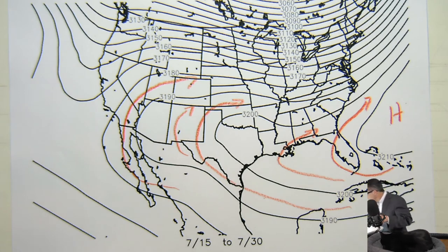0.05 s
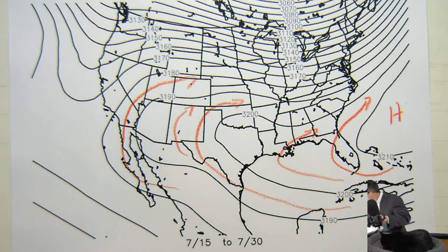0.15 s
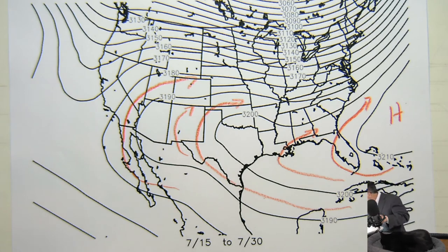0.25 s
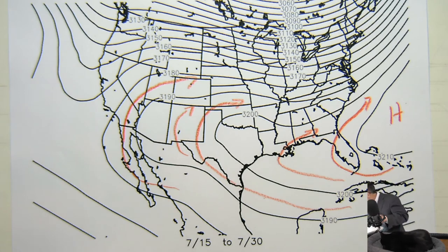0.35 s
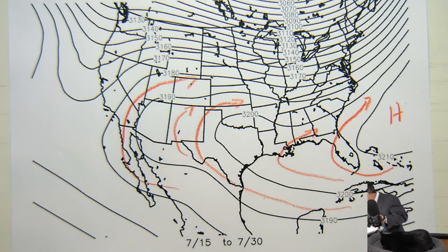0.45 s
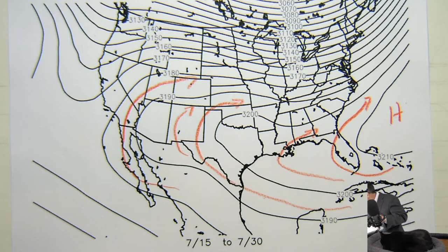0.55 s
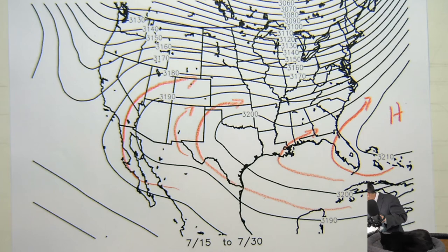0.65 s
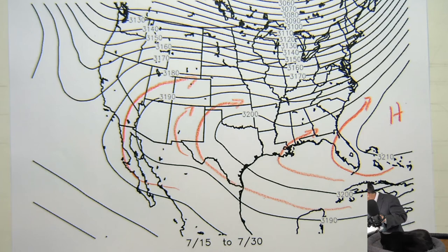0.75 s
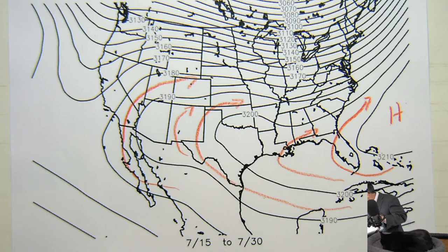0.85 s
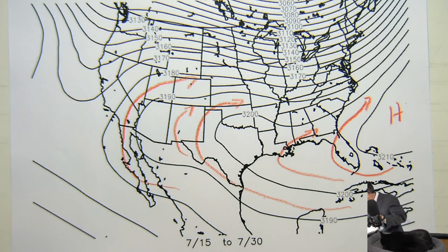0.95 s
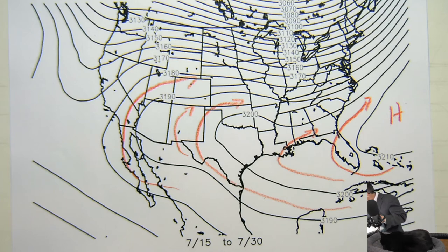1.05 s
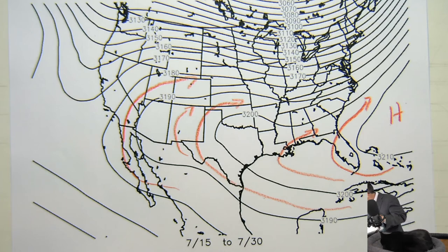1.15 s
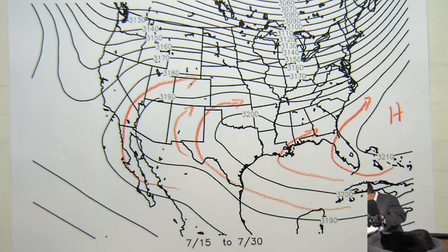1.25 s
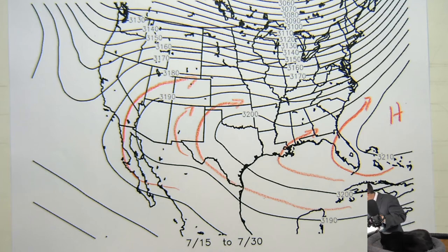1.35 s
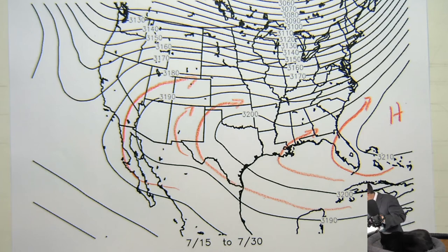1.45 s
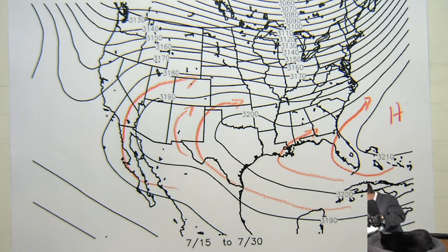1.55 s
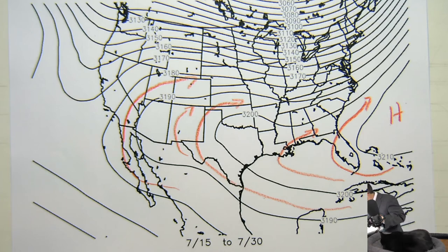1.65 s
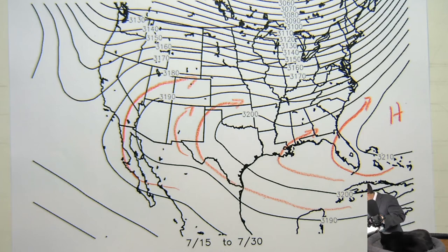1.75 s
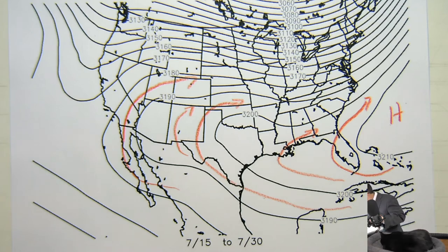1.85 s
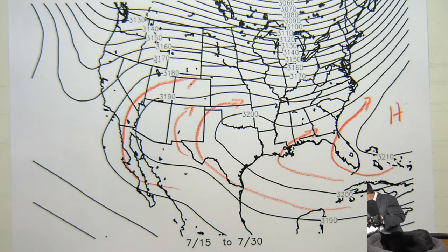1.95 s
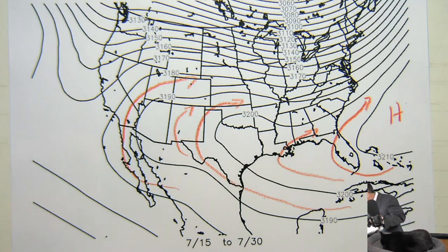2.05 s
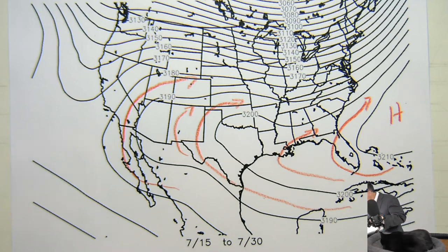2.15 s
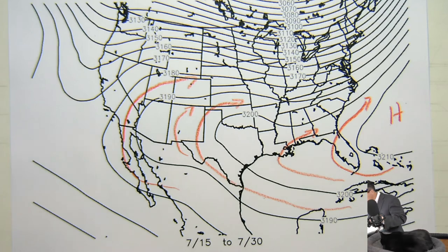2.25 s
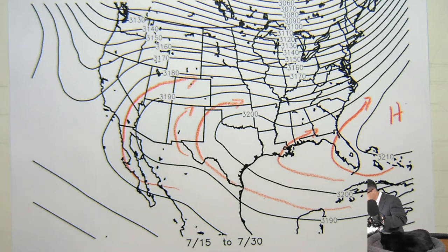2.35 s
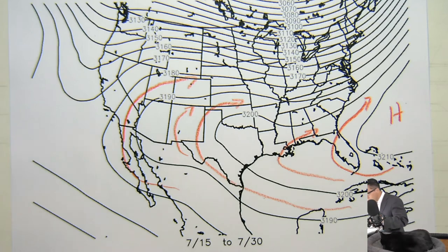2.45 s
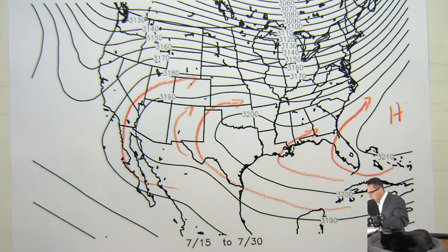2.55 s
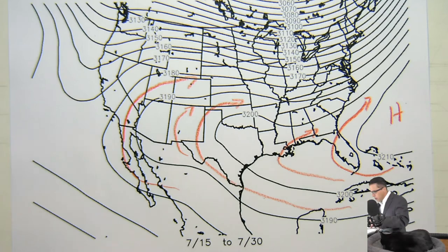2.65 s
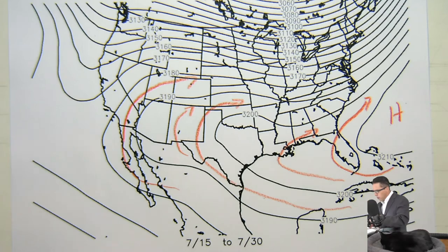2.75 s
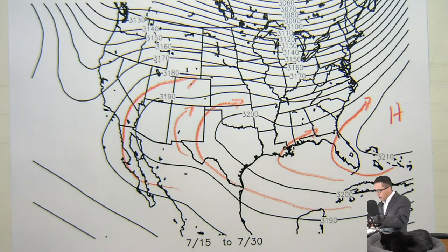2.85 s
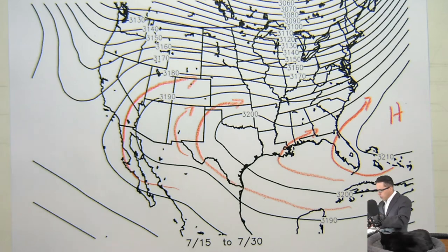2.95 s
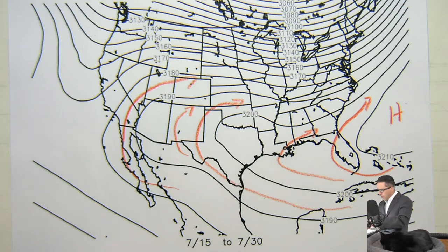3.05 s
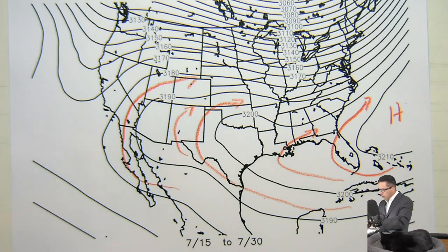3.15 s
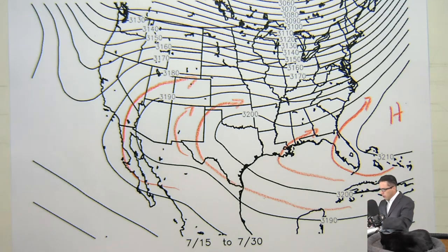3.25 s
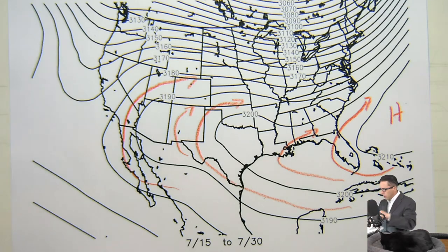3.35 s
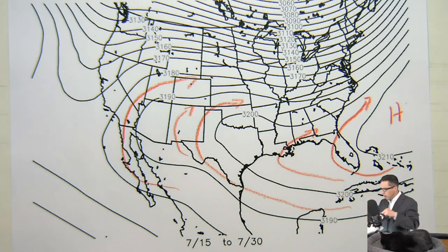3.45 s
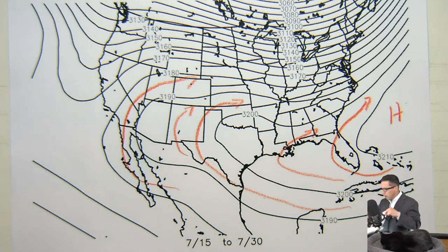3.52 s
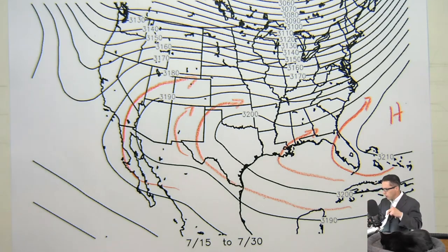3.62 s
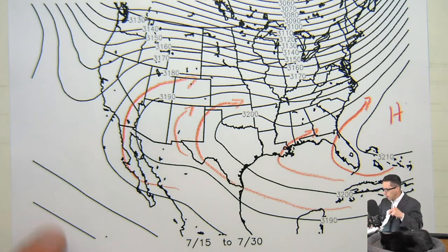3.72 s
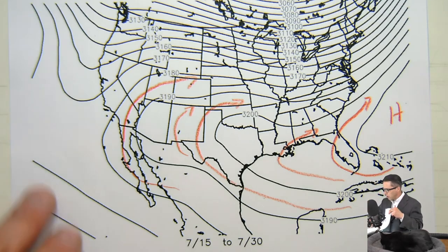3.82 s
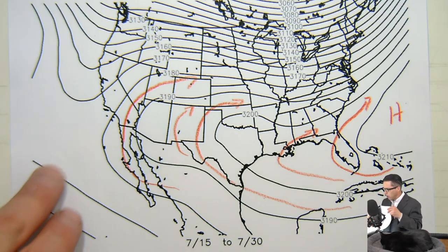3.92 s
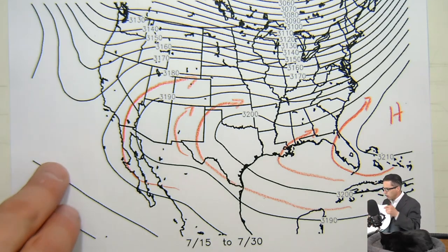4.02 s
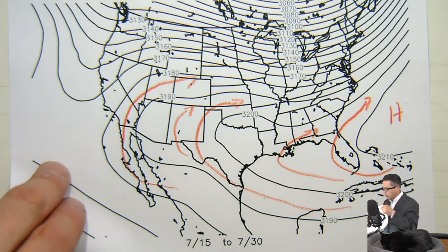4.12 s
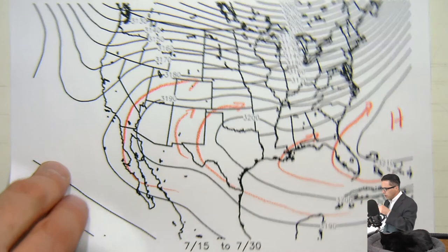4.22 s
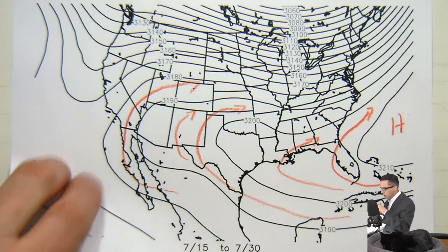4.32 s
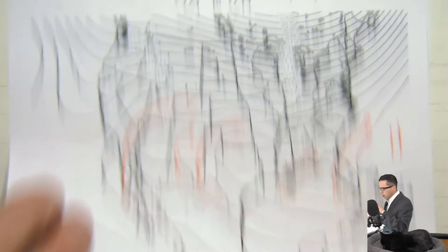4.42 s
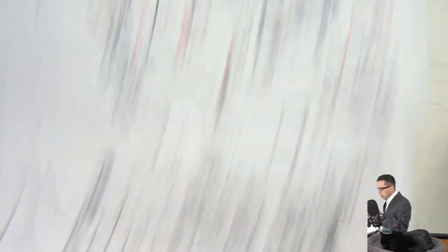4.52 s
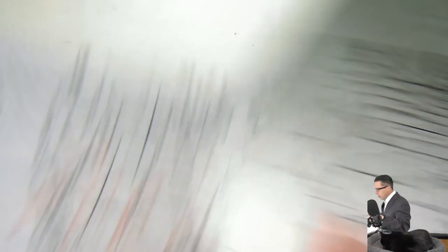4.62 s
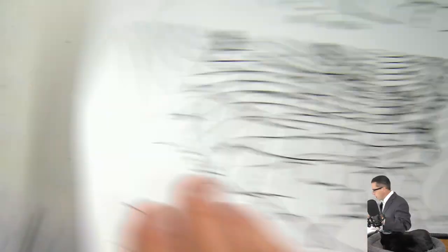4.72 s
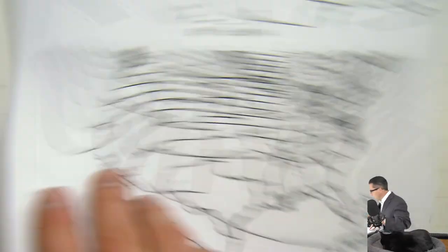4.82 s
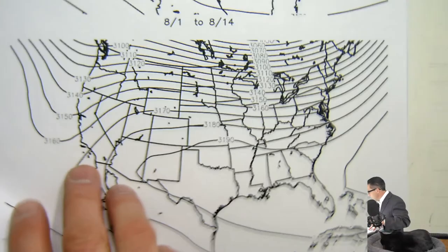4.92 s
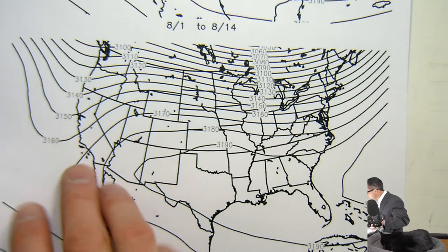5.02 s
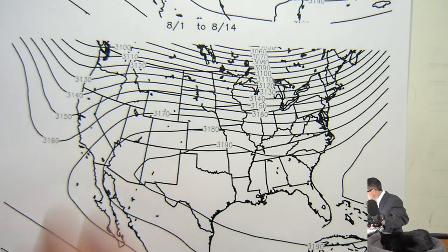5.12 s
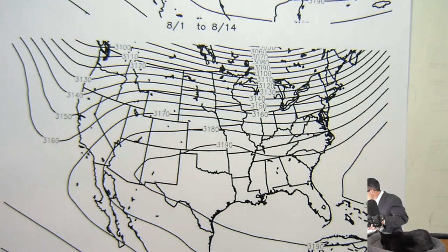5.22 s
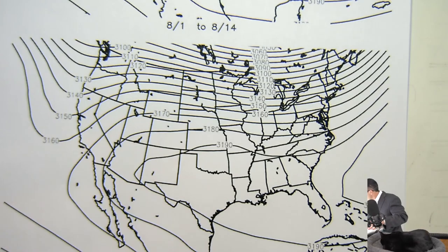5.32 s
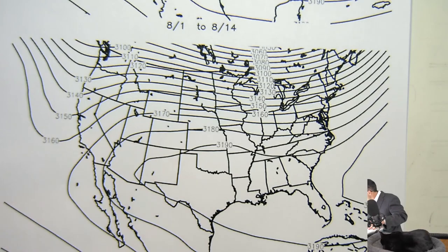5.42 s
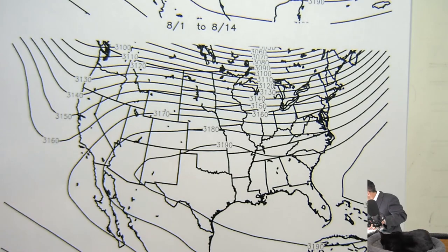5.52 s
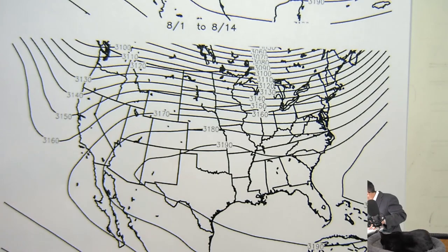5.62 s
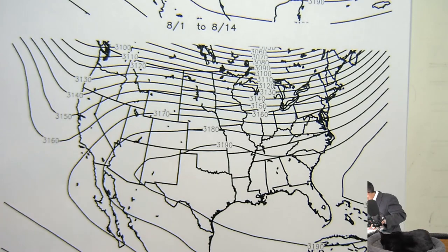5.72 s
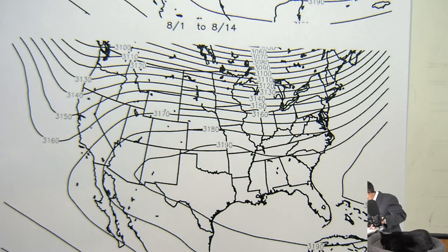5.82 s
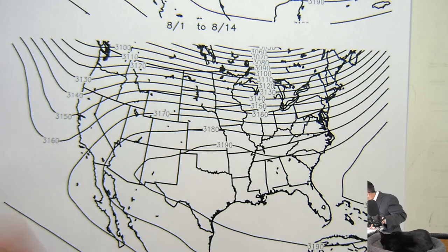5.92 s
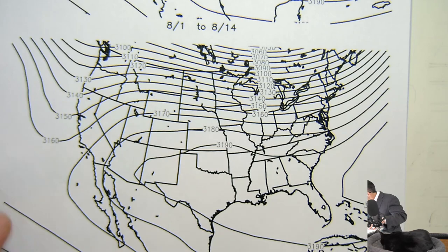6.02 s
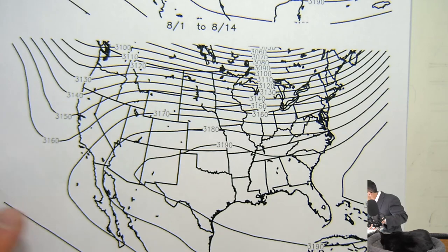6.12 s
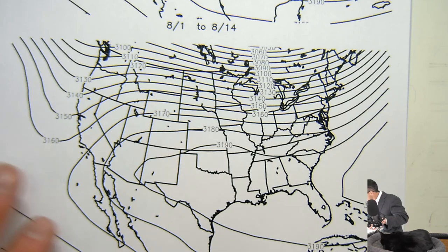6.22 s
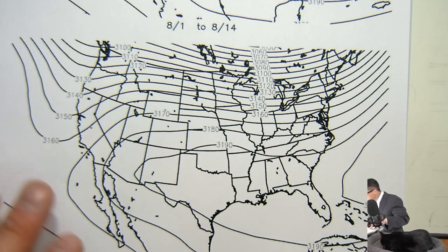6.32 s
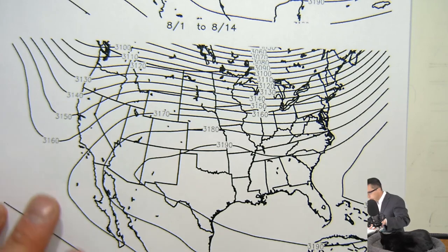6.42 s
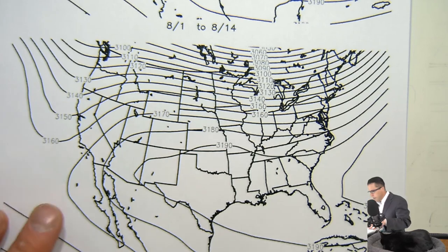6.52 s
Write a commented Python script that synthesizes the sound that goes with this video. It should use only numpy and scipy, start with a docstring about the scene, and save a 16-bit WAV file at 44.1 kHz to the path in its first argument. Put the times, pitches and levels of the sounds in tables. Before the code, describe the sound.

A close, dry microphone at a desk in a small room. A soft steady fan hum with a faint whine runs throughout, and very quiet low electrical pulses flutter in a quick burst then slower ticks, about once a second. Until 1.9 s there are only tiny paper rustles. A crisp click comes at 1.9, a small rub at 2.15, soft flaps and low desk bumps from 2.5 to 2.9. At 3.08 a bright, sharp crack; scraping follows, with another snap at 3.6 and a dull thump and slap until 3.7. Rustling swells to 4.0, where the loudest, very short hard snap hits. From 4.1 to 4.65 the sheet buckles, flapping hollow and wobbly, strongest around 4.35. A hollow knock lands at 4.83, softer flaps to 5.3, a lull, then a brisk bright scrape at 5.75 to 6.0, fading into faint rustle and hum by 6.5.

```python
"""In a small room, large paper sheets are lifted, flapped and swapped on a desk.
Buckles snap as shaped bursts of noise; flapping and sliding are noises with swelling levels.
Ticks, thumps and hollow flaps of paper are noise through a resonance; bumps ring the desk as fading sines.
A fan hums as coloured noise with faint whining tones.
A pattern of low electrical pulses returns about every second."""
import sys
import numpy as np
from scipy import signal
from scipy.fft import rfft, irfft, next_fast_len
from scipy.io import wavfile
from scipy.ndimage import uniform_filter1d, map_coordinates

SR = 44100
rng = np.random.default_rng(int(sys.argv[2]) if len(sys.argv) > 2 else 0)


def to_linear_factor(level_db):
    """Convert decibel levels (scalar or array-like) to linear amplitude factors."""
    exponent = np.asarray(level_db, float) / 20
    return 10 ** exponent


def int16_out(signal):
    """Quantize to a 16-bit WAV file."""
    q = np.round(np.clip(np.atleast_2d(signal).T, -1, 1) * 32767)
    wavfile.write(sys.argv[1], SR, q.astype(np.int16))


N = 289888  # length in samples

# Colour of the fan's air noise: (frequency [Hz], relative level per Hz [dB])
FAN_COLOUR = [(20, -32.5), (45, -19.5), (90, -25.5), (120, -5), (238, -5.5), (309, -12), (760, -13),
              (900, -18), (1700, -26.5), (3700, -33), (5400, -35.5), (15800, -34.5)]
# Tones of the fan's whine: (frequency [Hz], rms level [dB])
WHINE_TONES = [(60, -77), (120, -75), (183, -66), (240, -66.5), (786, -73), (1992, -77), (3978, -81.5),
               (5970, -88)]
# Electrical pulses of one round, a quick burst and then a slower tick: (time after the round's start [s])
PULSE_TIMES = [0, .018, .039, .055, .072, .102, .154, .255, .356, .455]
# Colour of the low flutter of a sheet: (frequency [Hz], relative level per Hz [dB])
FLUTTER_COLOUR = [(280, -11), (480, -3.5), (750, 4), (950, -1.5), (1250, -10), (1900, -46)]
# Colour of a dull rub of paper: (frequency [Hz], relative level per Hz [dB])
RUB_COLOUR = [(700, -29.5), (1150, -2), (1700, 0.5), (2500, -1.5), (3400, -7), (5000, -39.5)]
# Colour of a brighter scrape of paper: (frequency [Hz], relative level per Hz [dB])
SCRAPE_COLOUR = [(1600, -14), (2250, 1), (3000, 5.5), (4000, 3), (5200, -0.5), (7500, -23.5)]
# Colour of the fine hiss of paper: (frequency [Hz], relative level per Hz [dB])
HISS_COLOUR = [(3500, -15.5), (5500, -5), (8000, -6), (11000, -10.5), (16000, -19)]
# Sheets kept moving in the hands: (time [s], flutter level [dB], scrape level [dB])
HANDLING_LEVELS = [(0, -60.5, -65), (.25, -65.5, -72), (.8, -68.5, -102), (1.35, -66.5, -73.5),
                   (1.89, -69.5, -77.5), (1.96, -58, -51), (2.3, -58.5, -58.5), (2.43, -63, -60.5),
                   (2.6, -62.5, -66.5), (2.85, -60, -65), (3.03, -55.5, -58), (3.4, -63.5, -58),
                   (3.6, -58, -54), (3.8, -60, -63), (4.3, -58, -55.5), (4.4, -53.5, -57.5),
                   (4.75, -56, -56.5), (5.15, -58.5, -67.5), (5.33, -53, -59), (5.62, -66.5, -75),
                   (5.74, -57, -62.5), (5.85, -53, -56), (6.1, -57.5, -65.5), (6.57, -65.5, -68)]
# A loose sheet flaps or brushes the desk:
# (peak time [s], flutter level [dB], rub over flutter [dB], swell by 10 dB [ms], fade by 10 dB [ms])
FLAP_STROKES = [(2.146, -60, 13, 1, 25), (2.485, -49, -18, 35, 47), (2.716, -51.5, -10.5, 3, 118),
                (2.858, -50, -24, 30, 69), (3.12, -49.5, -7, 15.5, 52), (3.27, -62, 2, 146.5, 100),
                (3.385, -59.5, 10, 22, 19), (3.44, -54, 1, 36, 52), (3.49, -47.5, -2, 6, 15),
                (3.54, -54.5, 6, 32, 40), (3.66, -42, -5, 20, 37), (3.7, -48, 2.5, 18, 51),
                (3.77, -54, 4, 50, 44), (3.89, -47, -3.5, 75, 170), (4.04, -46.5, 4.5, 22, 14),
                (4.095, -69, 18, 39.5, 25), (4.13, -48, 4.5, 4, 17), (4.212, -48.5, 2, 22, 32),
                (4.38, -40.5, 1.5, 25, 62), (4.6, -42, 2, 26, 57), (4.65, -47.5, 0, 33, 100),
                (4.855, -47.5, -6, 16, 54), (4.978, -44.5, -3.5, 35, 21), (5.155, -54, -2, 22, 10),
                (5.297, -60, -1, 14, 40), (5.795, -44, 8, 31.5, 60), (5.905, -50.5, 6, 35, 32),
                (6.011, -56, 11.5, 60, 48)]
# One sheet is drawn over another:
# (peak time [s], scrape level [dB], hiss over scrape [dB], swell by 10 dB [ms], fade by 10 dB [ms])
DRAG_STROKES = [(.3, -73, 4, 33, 20), (.994, -68, -4, 27, 23), (1.205, -74, 6.5, 17, 53),
                (1.29, -76, 12, 64, 58), (1.615, -66.5, -2.5, 25, 30), (1.76, -73, 10.5, 18, 40),
                (1.87, -72, 11, 70, 50), (2.15, -53, 3.5, 27, 45), (2.872, -58, 2.5, 11, 129),
                (3.064, -46.5, 5.5, 49, 33), (3.12, -39.5, -5.5, 28, 55), (3.28, -50.5, 2.5, 201, 82),
                (3.38, -53.5, 4.5, 34, 14), (3.455, -48.5, -5, 40, 25), (3.54, -40.5, -6.5, 33, 42),
                (3.63, -40.5, -4.5, 30, 108), (3.755, -43, -1.5, 81, 37), (3.862, -46, -12.5, 47.5, 69),
                (3.94, -45, 3.5, 118, 114.5), (4.122, -50, -11.5, 19.5, 2), (4.41, -44, -3.5, 55.5, 70),
                (4.47, -45.5, 2, 48, 26), (4.51, -43, 1.5, 10.5, 22), (4.538, -43, -1, 28, 18),
                (4.6, -48, -18.5, 30, 34.5), (4.642, -47, -21, 16, 26), (4.976, -51, -13, 22, 23),
                (5.292, -49.5, -1, 7.5, 22), (5.752, -42.5, -0.5, 3.5, 35), (5.795, -40, -9, 22.5, 45),
                (5.969, -46.5, -6, 22, 32.5), (6.11, -54, -4, 120, 70), (6.248, -54.5, -3.5, 88, 105.5)]
# Pitched paper strokes, such as ticks, thumps and hollow flaps:
# (peak time [s], level [dB], stroke pitch [Hz], swell by 10 dB [ms], fade by 10 dB [ms])
PITCHED_STROKES = [(.615, -67, 4750, 15, 37), (1.5, -65, 6500, 16, 10), (1.55, -65, 7000, 25, 24),
                   (2.488, -50, 1240, 58, 47), (3.062, -39.5, 3080, 27, 32), (3.084, -20, 3010, -0.5, 10),
                   (3.385, -50, 1890, -4, 13), (3.555, -51, 2820, 26, 28), (3.6, -23.5, 2530, 4, 4),
                   (3.648, -30, 585, 2, 6.5), (3.652, -39, 207, 23, 21), (3.97, -43.5, 2700, 112, 52),
                   (4.0006, -8, 2373, 1, 3), (4.018, -35.5, 2500, 20, 12), (4.08, -46, 2700, 40, 40),
                   (4.121, -32.5, 2920, 14, 13.5), (4.2, -47.5, 670, 33, 66), (4.53, -45, 2930, 25, 45),
                   (4.6, -40, 744, 24, 19), (4.829, -27.5, 930, 1.5, 11.5), (4.842, -38.5, 1000, 7, 38),
                   (4.91, -46.5, 930, 40, 70), (4.976, -39, 1040, 12, 25), (5.23, -51, 777, 22, 57),
                   (5.42, -54, 840, 60, 93), (5.785, -32.5, 1024, 22, 44), (5.797, -34, 2600, 24, 34),
                   (5.86, -45.5, 910, 40, 52), (5.9, -47, 1500, 19, 30), (6.014, -43, 1120, 44, 20)]
# Buckling snaps and slaps:
# (time [s], crack level [dB], boom over crack [dB], crispness over crack [dB], crack's 60 dB fade [s])
SNAP_EVENTS = [(1.904, -36.5, 3.5, 9, 0.21), (1.9075, -25.5, -43, 3.5, .18), (2.145, -48, -15.5, -5, 0.21),
               (2.637, -51, -16, -2, 0.013), (2.711, -50.5, -6, -5, 0.024), (3.0746, -23.5, -17, 3, 0.051),
               (3.0836, -8.5, -24.5, 2.5, .016), (3.086, -21, -23, 1.5, .11), (3.165, -34.5, -7, 2, 0.019),
               (3.4134, -47, 11, -13, .025), (3.4897, -54.5, 16, -8, .05),
               (3.592, -12.5, -23.5, -2.5, 0.018), (3.595, -22.5, -5, -3, 0.13),
               (3.7053, -17.5, -14.5, -6, 0.018), (3.708, -33, -9.5, -10, 0.091),
               (4.0007, 2, -26, -21.5, .012), (4.004, -26.5, -4.5, -18, 0.049),
               (4.1241, -22.5, -24, -13, 0.021), (4.1549, -23, -11, -23, 0.058),
               (4.171, -29, -4, -19.5, 0.078), (4.206, -38.5, 0, -15, .05),
               (4.3261, -18.5, -9.5, -21, 0.016), (4.331, -17.5, -12.5, -22.5, 0.061),
               (4.352, -13, -10.5, -15.5, .079), (4.47, -40, -18, 7.5, 0.024),
               (4.825, -24.5, -4, -19, 0.0096), (4.827, -34, -6, -25.5, 0.15),
               (4.961, -35, -1, -16.5, 0.079), (5.026, -45.5, 4, -16.5, 0.068), (5.289, -58, 16, 1, .076),
               (5.743, -37, 1, -4, 0.11), (5.963, -40, -1.5, -10.5, 0.11)]
# Soft bumps on the desk top; a small ring time is a dead knock, a large one rings on:
# (time [s], level [dB], contact time [s], ring time relative to the table of tones [ratio])
BUMP_EVENTS = [(2.469, -40.5, 0.0032, 0.83), (2.72, -50.5, 0.0037, 1.1), (2.848, -30, 0.0024, 1.2),
               (2.899, -40, .005, 2), (3.077, -25, 0.0041, 0.43), (3.641, -21.5, 0.005, 0.33),
               (3.685, -37.5, .005, 1.2), (3.9978, -24.5, 0.00064, 0.041), (4.353, -29, 0.0024, 0.36)]
# Ringing tones of the desk top: (frequency [Hz], level [dB], usual 60 dB fade [s])
DESK_TONES = [(70, -13, .03), (154.2, -9, .08), (243.4, -3.5, 0.19), (285, -2.5, 0.12), (455, -1.5, 0.047),
              (706, -11.5, 0.069)]
# How long the walls' answer lasts: (frequency [Hz], 60 dB fade [s])
WALL_FADES = [(200, .5), (1000, 0.076), (4000, 0.2), (12000, 0.35)]


def unit(x):
    """Scales a signal to rms 1."""
    return x / np.sqrt(np.mean(x ** 2) + 1e-20)


def along(points, hz):
    """Reads (frequency, value) points on a logarithmic frequency axis."""
    f, v = np.transpose(points)
    return np.interp(np.log(hz + 1), np.log(f + 1), v)


def wobble(rate):
    """Draws a smooth random curve through `rate` random points a second."""
    knots = rng.standard_normal(int(N * rate / SR) + 4)
    return map_coordinates(knots, [np.arange(N) * rate / SR])


def filtered(x, response):
    """Multiplies the spectrum of x by a response that depends on frequency."""
    m = next_fast_len(N + SR // 2)
    return irfft(rfft(x, m) * response(np.fft.rfftfreq(m, 1 / SR)), m)[..., :N]


def rush(spectrum, patchy_db):
    """Makes coloured noise of rms 1, with random louder and softer patches in time and pitch."""
    z = signal.stft(rng.standard_normal(N), nperseg=512)[2]
    patches = uniform_filter1d(rng.standard_normal(z.shape), 6, 0)
    patches = uniform_filter1d(patches, 6, 1)
    noise = signal.istft(z * to_linear_factor(patchy_db * unit(patches)), nperseg=512)[1][:N]
    return unit(filtered(noise, lambda hz: to_linear_factor(along(spectrum, hz))))


def stroke_db(t, swell_ms, fade_ms):
    """Gives the dB under the peak, t seconds from it: a swell, a rounded top, a fade."""
    ms = 1000 * t
    edge = 1.5  # over 1 rounds the top of a stroke and steepens its ends
    return -10 * np.maximum(-ms / max(swell_ms, .5), ms / max(fade_ms, 3)) ** edge


def strokes(rows, steady_db, steady_over_db):
    """Gives the levels of two layers: a steady share plus strokes that swell and fade, added as power."""
    t = np.arange(N) / SR
    first = to_linear_factor(2 * steady_db)
    second = to_linear_factor(2 * (steady_db + steady_over_db))
    for peak_s, db, over_db, swell, fade in rows:
        power = to_linear_factor(2 * (db + stroke_db(t - peak_s, swell, fade)))
        first = first + power
        second = second + power * to_linear_factor(2 * over_db)
    return np.sqrt(first), np.sqrt(second)


def fan():
    """Steady air noise with tones that waver slightly in level and phase."""
    t = np.arange(N) / SR
    tones = np.zeros(N)
    for hz, db in WHINE_TONES:
        level = to_linear_factor(db + 0.7 * wobble(26)) * np.sqrt(2)  # a sine's peak is sqrt(2) times its rms
        tones += level * np.sin(2 * np.pi * hz * t + 0.8 * wobble(20))
    return to_linear_factor(-58) * rush(FAN_COLOUR, patchy_db=2.04) + tones


def pulses():
    """Each pulse dips for some milliseconds; coupling that blocks the lows makes it overshoot and settle."""
    first_round_s, round_s = -.108, 1.001  # the first round has begun before the start
    dip_db, centre_s = -46.5, .02
    out = np.zeros(N + 3 * SR)  # one spare second in front
    t = np.arange(SR // 10) / SR
    dip = -np.exp(-((t - centre_s) / 0.0042) ** 2)
    for start in np.arange(first_round_s, N / SR, round_s):
        for s in PULSE_TIMES:
            i = round((start + s - centre_s + 1) * SR)
            out[i:][:len(t)] += to_linear_factor(dip_db) * dip
    return filtered(out[SR:SR + N], lambda hz: 1j * hz / (1j * hz + 12))


def slide():
    """Sheets flap and paper drags over paper: fibres catch in clumps, and tiny creases tick."""
    t = np.arange(N) / SR
    s, flutter_db, scrape_db = np.transpose(HANDLING_LEVELS)
    # steady handling holds the rub 5 dB under the flutter and the hiss 0.5 dB under the scrape
    flutter_level, rub_level = strokes(FLAP_STROKES, np.interp(t, s, flutter_db), -5)
    scrape_level, hiss_level = strokes(DRAG_STROKES, np.interp(t, s, scrape_db), -0.5)
    creases = (rng.random(N) < 60 / SR) * rng.exponential(1, N)  # about 60 a second
    ticks = signal.lfilter([1], [1, -np.exp(-1 / (0.00086 * SR))], creases)  # each dies in about 1 ms
    catch = unit(to_linear_factor(1.1 * wobble(60) + 1.5 * wobble(300)) + .5 * ticks)
    flutter = flutter_level * to_linear_factor(0.36 * wobble(30)) * rush(FLUTTER_COLOUR, patchy_db=1.5)
    rub = rub_level * rush(RUB_COLOUR, patchy_db=1.8)
    scrape = scrape_level * rush(SCRAPE_COLOUR, patchy_db=1.8)
    hiss = hiss_level * rush(HISS_COLOUR, patchy_db=1.8)
    return flutter + catch * (rub + scrape + hiss)


def pitched_strokes():
    """Ticks, thumps and hollow flaps of paper: each is noise through one resonance, applied twice."""
    width = 0.55  # of one pass of the resonance, as a share of its pitch
    out = np.zeros(N + 2 * SR)
    t = np.arange(-SR // 2, SR // 2) / SR
    f = np.fft.rfftfreq(len(t), 1 / SR)
    for peak_s, db, hz, swell, fade in PITCHED_STROKES:
        damping = 1j * f * hz * width
        resonance = damping / (hz * hz - f * f + damping)
        noise = irfft(rfft(rng.standard_normal(len(t))) * resonance ** 2, len(t))
        shape = to_linear_factor(stroke_db(t, swell, fade))
        # each stroke spends a set energy, however its noise falls
        even_out = np.linalg.norm(shape) / np.linalg.norm(shape * noise)
        out[round(peak_s * SR):][:len(t)] += to_linear_factor(db) * shape * noise * even_out
    return out[SR // 2:][:N]


def snaps():
    """A buckle lets go: the sheet booms, cracks and hisses with one sharp start."""
    out = np.zeros(N + SR)
    t = np.arange(SR // 3) / SR
    colours = (FLUTTER_COLOUR, RUB_COLOUR, SCRAPE_COLOUR, HISS_COLOUR)
    boom, dull, sharp, crisp = (np.pad(rush(c, patchy_db=0.0), (0, SR)) for c in colours)
    for s, db, boom_db, crisp_db, t60 in SNAP_EVENTS:
        i = round(s * SR)
        cut = slice(i, i + len(t))
        onset = 1 - np.exp(-t / max(0.033 * t60, 1e-4))  # rises in a small share of the fade time
        life = max(t60, 4e-3)
        # the more the sheet booms and the less crisp it is, the lower its crack
        slack = 0.085 / (1 + to_linear_factor(crisp_db + 6.5)) + 0.99 / (1 + to_linear_factor(-boom_db - 6.5))
        crack = slack * dull[cut] + (1 - 1.2 * slack) * sharp[cut]
        # large bending waves outlast the fine crackle
        ring = to_linear_factor(boom_db - 60 * t / (0.82 * life)) * boom[cut]
        ring += to_linear_factor(-60 * t / life) * crack
        ring += to_linear_factor(crisp_db - 60 * t / (0.68 * life)) * crisp[cut]
        # each snap spends a set energy, however its noise falls
        due = np.sum(to_linear_factor(-120 * t / life) * onset ** 2)
        due *= 1 + to_linear_factor(2 * boom_db) + to_linear_factor(2 * crisp_db)
        burst = onset * ring
        out[cut] += to_linear_factor(db) * burst * np.sqrt(due / np.sum(burst ** 2))
    return filtered(out[:N], lambda hz: (1j * hz / (1j * hz + 120)) ** 2)  # thins out the lows


def bumps():
    """A hand or a stack of sheets lands and the desk top rings low; a longer contact softens the start."""
    out = np.zeros(N + SR)
    t = np.arange(SR // 3) / SR
    for s, db, contact, ring_ratio in BUMP_EVENTS:
        scatter_db = rng.normal(0, 2, len(DESK_TONES))  # each bump stirs the tones differently
        ring = np.zeros(len(t))
        for (hz, level, t60), extra_db in zip(DESK_TONES, scatter_db):
            fade = to_linear_factor(level + extra_db - 60 * t / (ring_ratio * t60))
            ring += fade * np.sin(2 * np.pi * hz * t)
        out[round(s * SR):][:len(t)] += to_linear_factor(db) * ring * (1 - np.exp(-t / contact))
    return out[:N]


def room(x):
    """The walls answer with a noise tail in which each frequency dies at its own speed."""
    hz, t, z = signal.stft(rng.standard_normal(SR // 2), SR, nperseg=256)
    fade = to_linear_factor(-60 * t / along(WALL_FADES, hz)[:, None])
    tail = signal.istft(z * fade, SR, nperseg=256)[1]
    late = np.pad(x, (200, 0))  # the answer comes 200 samples late
    return signal.fftconvolve(late, tail / np.linalg.norm(tail))[:N]


def scene():
    """Paper and desk in the room, over the fan and the pulses."""
    struck = pitched_strokes() + snaps() + bumps()
    return (fan() + pulses() + slide() + struck + to_linear_factor(-19) * room(struck))[None]


def roll_off(x):
    """The treble ends steeply here."""
    return signal.sosfilt(signal.butter(12, 16330, fs=SR, output="sos"), x)


def record(dry):
    """Peaks beyond full scale are clipped flat."""
    mix = np.clip(dry, -1, 1)
    return roll_off(mix)


dry = scene()
out = record(dry)
int16_out(out)
```